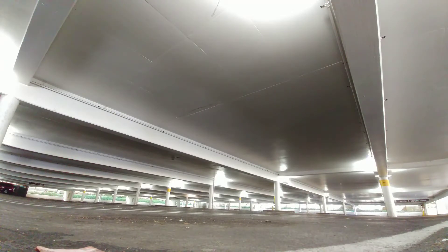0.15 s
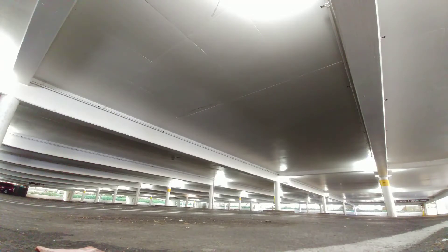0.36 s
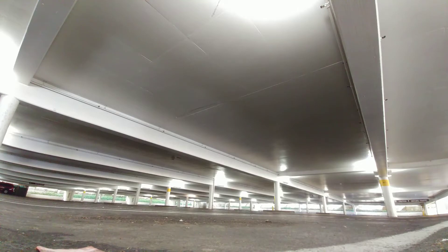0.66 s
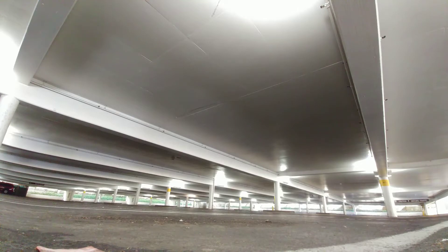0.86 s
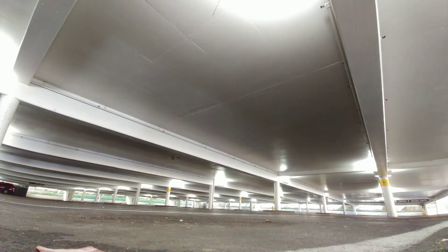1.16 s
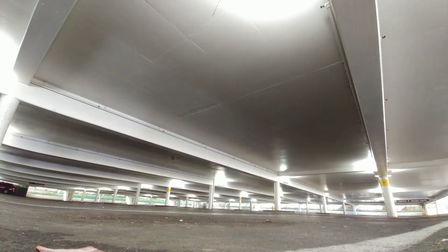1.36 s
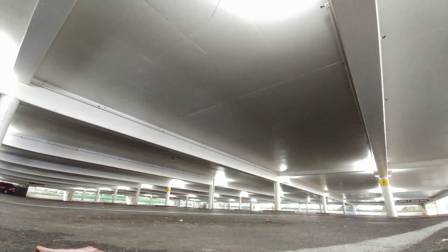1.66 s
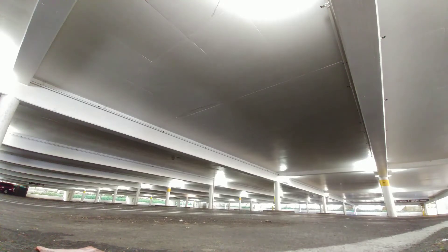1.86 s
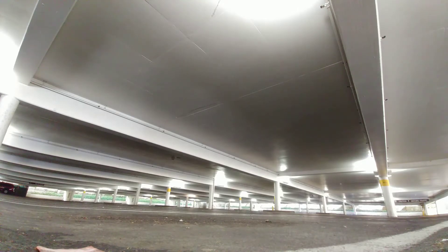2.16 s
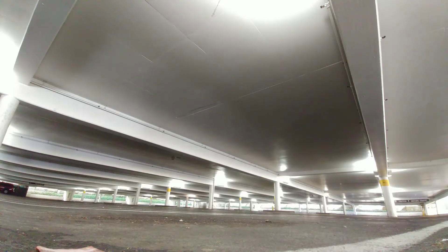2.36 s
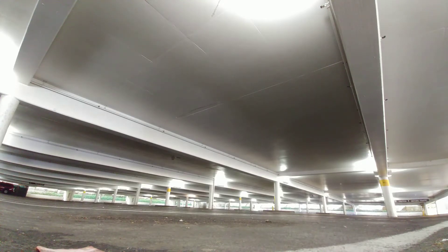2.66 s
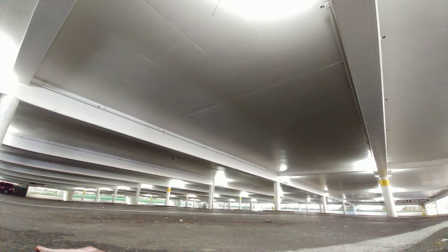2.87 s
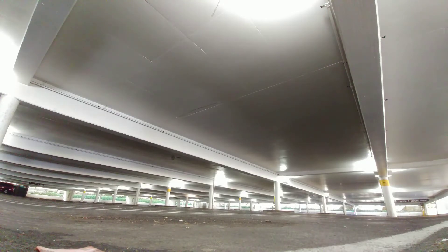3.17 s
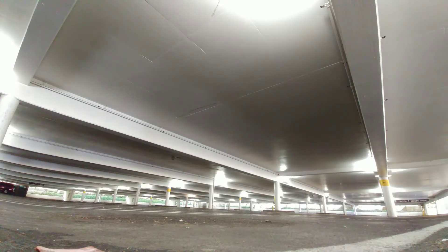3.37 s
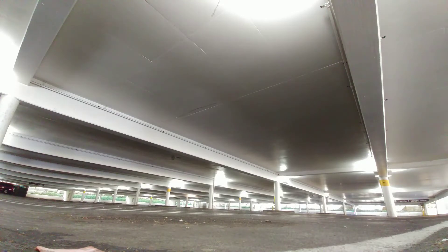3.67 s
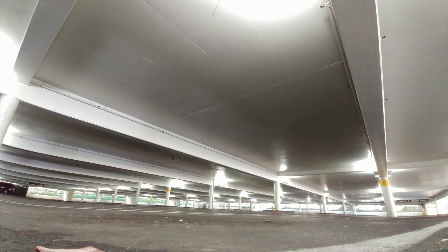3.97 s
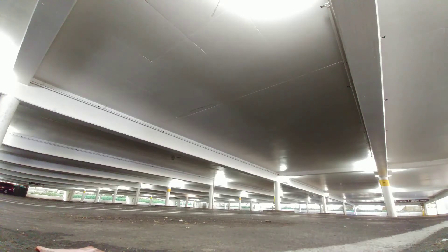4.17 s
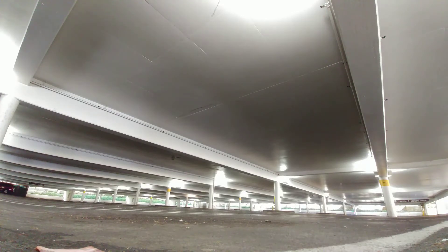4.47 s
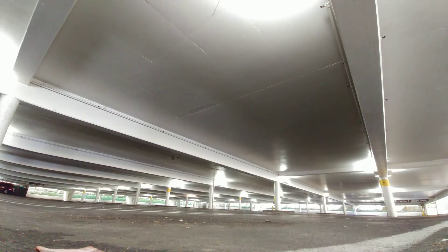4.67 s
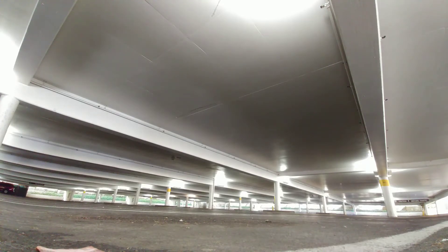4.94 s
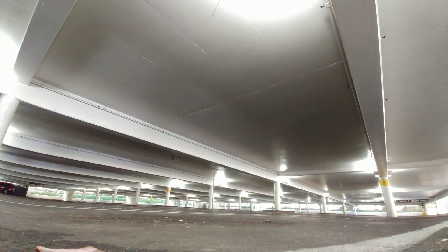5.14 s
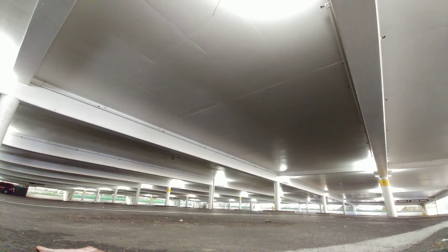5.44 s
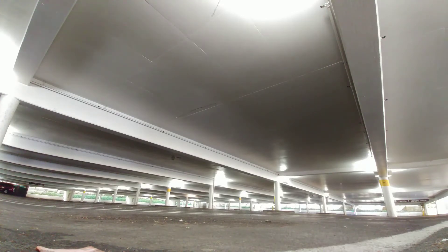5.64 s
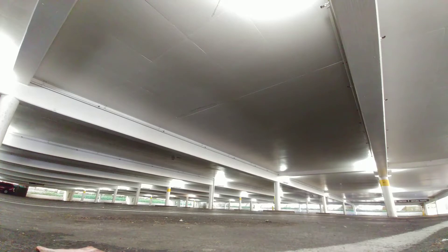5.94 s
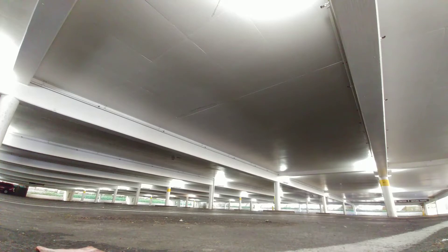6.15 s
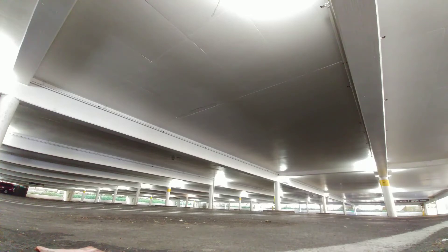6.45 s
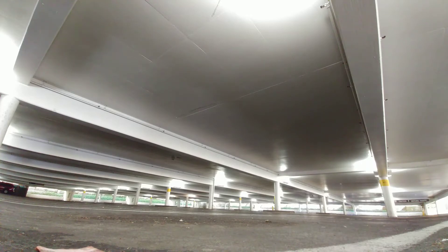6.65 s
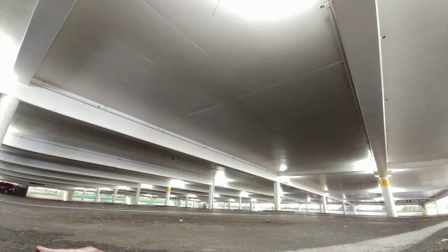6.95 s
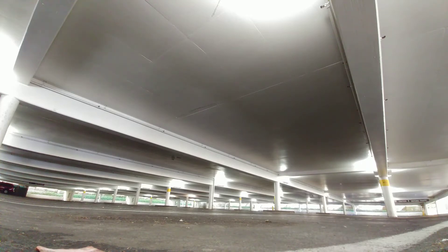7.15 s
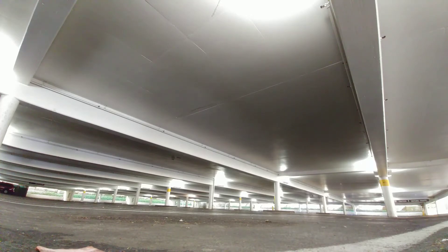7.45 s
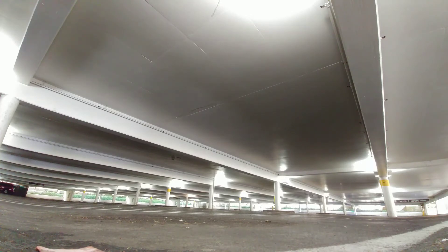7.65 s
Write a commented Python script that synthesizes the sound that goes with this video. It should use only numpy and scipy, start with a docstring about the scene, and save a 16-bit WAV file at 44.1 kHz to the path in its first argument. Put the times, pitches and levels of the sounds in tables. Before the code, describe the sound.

One single engine rev, heard in stereo in a large reverberant garage: deep exhaust boom pulsing against its own echo, swelling into hard rasp and a nasal pipe drone, then dropping steadily over several seconds. Thin high whistles flutter during the fall, clatter softens, and a quiet lumpy idle remains with a faint whine. A brief sputtering puff of air, with a soft thump, closes it.

```python
"""Sports car revving in a concrete garage

A four-cylinder engine revs once and sinks back to a droning idle; every layer but the whistles and the spit
of air follows one firing phase. The exhaust boom is a sine with harmonics, set ringing by the garage; pulse
trains and noise excite the tailpipe as rasp and drone. Clatter and gas are noise flaring at each firing;
thin whistles sound as the revs fall, and air spits sharply at the end. The boom throbs, and a limiter ducks
the whole sound at its peaks."""
import sys
import numpy as np
from scipy import signal
from scipy.fft import rfft, irfft, next_fast_len
from scipy.io import wavfile
from scipy.ndimage import uniform_filter1d, minimum_filter1d

SR = 44100
rng = np.random.default_rng(int(sys.argv[2]) if len(sys.argv) > 2 else 0)


def unload_wav(signal):
    """Save mono or channel-first audio to the path in sys.argv[1] as 16-bit WAV at rate SR, clipped to [-1, 1]."""
    wavfile.write(
        sys.argv[1],
        SR,
        np.round(np.clip(np.atleast_2d(signal).T, -1, 1) * 32767).astype(np.int16),
    )


N = 344421
TIME = np.arange(N) / SR

# engine speed before its small wander: t/s, firing rate/Hz
ENGINE_SPEED = [(0, 85), (.25, 88.4), (.5, 100.4), (.72, 110.6), (.92, 125.7), (1.2, 139), (1.5, 151.7),
                (1.88, 190), (2.3, 178.5), (2.9, 131.5), (3.5, 106.4), (3.85, 84.6), (4.2, 67.6),
                (4.45, 57), (4.75, 54), (5.0, 44), (5.85, 39.5), (6.2, 34.2), (6.75, 28.4), (7.3, 27.4),
                (7.81, 28.2)]


def engine_speed():
    """Quasi-periodicity: the firing rate follows the rev, never quite even."""
    return curve(ENGINE_SPEED) * (1 + .005 * wander(top_hz=10))


# mean strength of each cylinder's pulse, in firing order: level/dB
CYLINDER_LEVELS = [0.88, -1.2, 0.55, 0.94]
# spread of pulse strength as a fraction of its mean, off and on the throttle
UNEVEN_COASTING, UNEVEN_DRIVEN = .5, .3


def firings(turns, uneven):
    """Impulse excitation: one pulse a firing; cylinders differ, and so does each burn."""
    at = np.flatnonzero(np.diff(np.floor(turns)))
    cylinder = gain_of(np.resize(CYLINDER_LEVELS, len(at)))
    burn = 1 + uneven[at] * rng.standard_normal(len(at))
    pulses = np.zeros(N)
    pulses[at] = cylinder * burn
    return pulses


def puffs(turns, length, between):
    """Modulated turbulence: noise flares at each firing and dies away; length is in firing periods."""
    flare = np.exp(-(turns % 1) / length)
    return (between + flare) * rng.standard_normal(N)


# exhaust boom before throbs and trim: t/s, level/dB
BOOM_LEVEL = [(0, -5), (.22, -14), (.33, -14.5), (.55, -9), (1.6, -12), (1.9, -16.5), (2.35, -9),
              (2.7, -13.5), (3.6, -9), (4.7, -8), (5.6, -19.5), (6.6, -20), (6.9, -16.9), (7.81, -15)]
# silencer response: f/Hz, level/dB
SILENCER_RESPONSE = [(25, -39.5), (40, -21), (53, 16), (185, 2), (260, -13)]
# gain of the garage echo added to the direct engine note: t/s, level/dB
ECHO_LEVEL = [(0, 0), (.6, 1), (1.1, 6), (2.0, 5), (2.8, 10), (3.3, 2), (3.9, -4), (4.7, 3), (6.2, 1),
              (6.9, -9)]
# before the silencer, against the firing note: half order at the top of the revs, third harmonic at idle
HALF_ORDER_DB, IDLE_THIRD_DB = -15.5, -8.5
BOOM_TRIM_DB = 2.08
LOW_CUT_HZ = 48.3  # little of the boom is picked up below this


def boom(turns, rate):
    """Harmonic radiation and reverberation: the firing note meets its echo; overtones take over near idle."""
    idling = np.clip((51 - rate) / 17, 0, 1)
    racing = np.clip((rate - 140) / 45, 0, 1)
    force = gain_of(5.2 * racing)  # the top of the rev is loudest and hangs longest in the garage
    slowing = uniform_filter1d(1. * (np.gradient(curve(ENGINE_SPEED)) < 0), size=SR // 2)

    angle = 2 * np.pi * turns
    second = (0.1 + 4.5 * idling) * np.sin(2 * angle)
    third = gain_of(IDLE_THIRD_DB) * idling * np.sin(3 * angle)
    half = gain_of(HALF_ORDER_DB) * racing * slowing * np.sin(angle / 2)
    source = force * colour(np.sin(angle) + second + third + half, SILENCER_RESPONSE)

    near = direct(source + standing_waves(source))
    echo = gain_of(curve(ECHO_LEVEL)) * garage(source)
    note = steady(near + echo, seconds=0.54)
    level = gain_of(curve(BOOM_LEVEL) + throbs() + BOOM_TRIM_DB)
    x = level * steady(note + burble(turns, rate), seconds=0.12)
    return filtered(x, lambda hz: 1 - 1 / (1 + (hz / LOW_CUT_HZ) ** 10))


# throbs, where the note and its echo fall into step: middle t/s, length t/s, swell level/dB
THROB_TIMES = [(0.182, 0.09, 11.5), (0.486, 0.073, 11.5), (0.554, 0.033, 8), (0.609, 0.025, 9.5),
               (0.78, 0.11, 3), (0.908, 0.11, 2.5), (1.039, 0.077, 9.5), (1.798, 0.036, 4.5),
               (2.258, 0.1, 0), (2.426, 0.14, -1), (3.588, 0.025, 4.5), (3.828, 0.14, 3.5),
               (4.012, 0.086, 6), (4.284, 0.045, 6), (4.41, 0.032, 3), (4.97, 0.069, 2.5),
               (5.194, 0.089, 3), (5.507, 0.067, 5.5), (5.766, 0.11, 6), (6.495, 0.14, 3.5)]
# short gaps before and after each throb, where the two cancel: depth, distance from its edge, half-width
GAP_DB, GAP_AFTER_S, GAP_S = -6, 0.023, 0.012


def throbs():
    """Interference, as tabled level changes in dB: a rounded swell between two short gaps."""
    db = np.zeros(N)
    for middle, length, swell_db in THROB_TIMES:
        away = abs(TIME - middle)
        swell = swell_db * np.exp(-(2 * away / length) ** 4)
        gaps = GAP_DB * np.exp(-((away - length / 2 - GAP_AFTER_S) / GAP_S) ** 2)
        db += swell + gaps
    return db


# standing waves of the garage: f/Hz, width f/Hz, level/dB
ROOM_MODES = [(55.55, 1.2, 8), (76.5, 0.76, 19.5), (87.3, 1, 7), (129, 0.91, 9.5), (177.4, 1.5, 13)]


def standing_waves(x):
    """Modal resonance: each standing wave builds while the note is on it and rings on afterwards."""
    out = np.zeros(N)
    for hz, width_hz, db in ROOM_MODES:
        keep = np.exp(-np.pi * width_hz / SR)  # decay per sample
        pole = keep * np.exp(2j * np.pi * hz / SR)
        out += gain_of(db) * 2 * signal.lfilter([1 - keep], [1, -pole], x).real
    return out


# colour of the burble: f/Hz, level/dB per Hz
BURBLE_COLOUR = [(20, -39.5), (44, -32.5), (55, 1), (62, -10), (72, -0.5), (86, -2.5), (100, -7),
                 (113, -9.5), (135, -15.5), (190, -24.5), (300, -42), (2000, -150)]
# colour of the lope, the uneven beat of the settled idle: f/Hz, level/dB per Hz
LOPE_COLOUR = [(52, -28), (80, 0), (110, -3), (150, -11), (260, -28), (2000, -150)]
# burble against the note, most as the engine coasts and elsewhere; firing rate where it is most, spread
BURBLE_TOP_DB, BURBLE_REST_DB, BURBLE_RATE_HZ, BURBLE_OCTAVES = 3.5, -19, 42, 0.72
LOPE_DB = -6.5  # against the note
# firing rate at which the idle has settled, and how far above it the burble starts to give way
SETTLED_HZ, SETTLING_HZ = 29.2, 2.2


def burble(turns, rate):
    """Random amplitude modulation: uneven burns burble on the way down to idle, then lope more lightly."""
    burns = garage(firings(turns, np.full(N, UNEVEN_COASTING)))
    coasting = np.exp(-(np.log2(rate / BURBLE_RATE_HZ) / BURBLE_OCTAVES) ** 2)
    unsettled = np.clip((rate - SETTLED_HZ) / SETTLING_HZ, 0, 1)
    burble_db = BURBLE_REST_DB + (BURBLE_TOP_DB - BURBLE_REST_DB) * coasting
    burbling = gain_of(burble_db) * steady(colour(burns, BURBLE_COLOUR), seconds=0.085)
    loping = gain_of(LOPE_DB) * steady(colour(burns, LOPE_COLOUR), seconds=0.14)
    return unsettled * burbling + (1 - unsettled) * loping


# pipe rasp before trim and wander: t/s, level/dB
RASP_LEVEL = [(0, -21), (0.22, -26.5), (0.38, -18), (.8, -19.5), (1.5, -14.5), (1.95, -15), (2.7, -16.5),
              (3.7, -21), (4.0, -27.5), (5.4, -32), (6.8, -29.5), (7.55, -30)]
# tailpipe response: f/Hz, level/dB
PIPE_RESPONSE = [(90, -23), (150, -3), (240, -5), (285, -4), (314, 0.5), (362, -8), (440, -5.5),
                 (650, -8.5), (800, -12), (1020, -10), (1300, -29), (2200, -35.5), (5000, -73.5)]
RASP_TRIM_DB, RASP_WANDER_DB = 2, 1
PIPE_DIRECT_DB = -8  # gain of the direct pipe sound added to its garage echo
SOFT_HZ = 625  # slow pulse fronts carry little above this


def rasp(turns, rate):
    """Source and filter: sharp pulse fronts and gas ring the pipe; off the throttle mostly gas is left."""
    pedal = throttle()
    uneven = UNEVEN_COASTING + (UNEVEN_DRIVEN - UNEVEN_COASTING) * pedal  # burns are steadier under load
    fronts = (0.15 + 0.79 * pedal) * firings(turns, uneven)
    gas = 0.056 * puffs(turns, length=0.43, between=0.42)
    drive = fronts + gas
    heard = colour(gain_of(PIPE_DIRECT_DB) * direct(drive) + garage(drive), PIPE_RESPONSE)

    soft = filtered(heard, lambda hz: 1 / (1 + (hz / SOFT_HZ) ** 8))
    steep = np.clip((rate - 55) / 105, .3, 1)  # the fronts steepen with the revs
    level = gain_of(curve(RASP_LEVEL) + RASP_TRIM_DB + RASP_WANDER_DB * wander(top_hz=7.6))
    return level * steady(soft + steep * (heard - soft), seconds=0.14)


# the one press of the pedal: down from, down by, lifted from, lifted by; resting opening (0-1)
PRESS_S, FULL_S, LIFT_S, SHUT_S, IDLE_THROTTLE = 0.18, 0.49, 2.7, 3.1, 0.23


def throttle():
    """Load control: the pedal goes down, is held and is lifted."""
    opening = [IDLE_THROTTLE, 1, 1, IDLE_THROTTLE]
    return np.interp(TIME, [PRESS_S, FULL_S, LIFT_S, SHUT_S], opening)


# pipe drone before flutter: t/s, level/dB
DRONE_LEVEL = [(0, -34.5), (.3, -27), (.72, -17.5), (1.6, -14), (1.9, -18), (2.4, -13.5), (3.05, -20),
               (3.7, -34), (4.2, -51.5), (7.81, -80)]
DRONE_HZ, DRONE_WIDTH_HZ = 536, 49  # upper resonance of the pipe, and half-width of each of its four stages
DRONE_JITTER_TURNS, DRONE_FLUTTER_DB = .025, 2.0  # jitter in firing periods


def drone(turns):
    """Resonance: the pipe sings on harmonics near its mode; uneven firing and the garage make it flutter."""
    jittered = turns + DRONE_JITTER_TURNS * wander(top_hz=41)
    pulses = firings(jittered, np.full(N, UNEVEN_DRIVEN))
    x = resonance(pulses, DRONE_HZ, DRONE_WIDTH_HZ)
    sung = steady(gain_of(PIPE_DIRECT_DB) * direct(x) + garage(x), seconds=.09)
    return gain_of(curve(DRONE_LEVEL) + DRONE_FLUTTER_DB * wander(top_hz=30)) * sung


def resonance(x, centre_hz, width_hz):
    """Cascaded resonance: four equal stages give the tailpipe mode steep sides."""
    return filtered(x, lambda hz: 1 / (1 + 1j * (hz - centre_hz) / width_hz) ** 4)


# engine clatter before trims, surges and wander: t/s, level/dB
CLATTER_LEVEL = [(0, -46.5), (0.25, -45), (1.0, -34.5), (1.5, -30), (1.95, -26.5), (2.3, -27), (2.75, -26),
                 (3.3, -27), (3.65, -31), (3.9, -41), (4.75, -38), (5.8, -40), (6.4, -36), (7.55, -35)]
# colour of the clatter when revved: f/Hz, level/dB per Hz
REVVED_COLOUR = [(410, -29.5), (700, -2.5), (792, -2.5), (949, -3), (1090, 0.5), (1320, -5.5), (1580, -5),
                 (2070, -8.5), (2700, -12), (3660, -17.5), (4530, -31), (5000, -35.5), (6500, -50),
                 (11000, -120)]
# colour of the clatter at idle: f/Hz, level/dB per Hz
IDLE_COLOUR = [(330, -60), (560, -2.5), (648, 0.5), (758, -8), (861, -4), (1240, -9), (1550, -8),
               (2210, -15), (2830, -19), (3020, -22.5), (3470, -20), (4050, -28), (5000, -43), (6500, -79),
               (11000, -120)]
CLATTER_TRIM_DB = 1


def clatter(turns, rate):
    """Modulated noise: valves and combustion rattle over steady noise, the echo that fills the gaps."""
    revved = np.clip((rate - 58) / 32, 0, 1)
    x = microphones(puffs(turns, length=0.38, between=4.5), puffs(turns, length=1.0, between=4.3))
    fast = gain_of(2.0) * steady(colour(x, REVVED_COLOUR), seconds=0.32)
    slow = gain_of(3.5) * steady(colour(x, IDLE_COLOUR), seconds=.4)
    mix = np.sqrt(revved) * fast + np.sqrt(1 - revved) * slow
    level = gain_of(curve(CLATTER_LEVEL) + CLATTER_TRIM_DB + surges() + 0.56 * wander(top_hz=27))
    return level * mix * gain_of([[.5], [-.5]])


# surges of the roar: middle t/s, length t/s, swell level/dB
SURGE_TIMES = [(0.41, 0.098, 1.5), (0.885, 0.064, 1.5), (1.544, 0.12, 4.5), (1.847, 0.049, -1),
               (2.1, 0.037, 3.5), (2.579, 0.081, 4), (2.83, 0.086, 1.5), (3.73, 0.16, 2.5),
               (4.369, 0.15, 2.5)]


def surges():
    """Amplitude modulation: brief changes of the engine's roar, mostly swells, in dB."""
    return sum(db * np.exp(-(2 * (TIME - middle) / length) ** 2) for middle, length, db in SURGE_TIMES)


# rush of gas before surges: t/s, level/dB
GAS_LEVEL = [(0, -63), (0.25, -63.5), (1.0, -48.5), (1.95, -36), (2.25, -39.5), (2.6, -36), (3.45, -41.5),
             (3.95, -51.5), (4.9, -52), (5.6, -56), (7.1, -58), (7.55, -62)]
# colour of the rush of gas: f/Hz, level/dB per Hz
RUSH_COLOUR = [(2800, -35.5), (4300, 0.5), (5200, -1.5), (5900, 0.5), (6800, -7), (7700, 4), (8600, -5),
               (9500, -15), (10200, -43.5), (12000, -21.5), (13500, -44.5), (15500, -33)]


def rush(turns):
    """Turbulence noise: gas and belts hiss, mostly on the left."""
    left, right = puffs(turns, length=0.99, between=0.93), puffs(turns, length=0.26, between=1.0)
    x = colour(microphones(left, right), RUSH_COLOUR) * gain_of([[2.5], [-2.5]])
    return gain_of(curve(GAS_LEVEL) + 0.8 * surges()) * steady(x, seconds=0.21)


# whistles before flutter and panning: start t/s, peak t/s, end t/s, f/Hz, width f/Hz, peak level/dB
WHISTLE_BANDS = [ (3.6, 3.87, 3.99, 13100, 450, -47), (3.98, 4.1, 4.3, 13050, 400, -58),
                 (4.2, 4.55, 5.5, 14150, 300, -69), (3.0, 5.15, 6.5, 5800, 380, -58),
                 (3.0, 5.0, 12, 1310, 24, -55), (2.0, 5.5, 12, 2736, 20, -58), ]


def whistles():
    """Narrow-band noise: fluttering whistles swell and fade; the two lowest stay on as a faint whine."""
    out = np.zeros((2, N))
    for start, peak, end, pitch, width, db in WHISTLE_BANDS:
        noise = rng.standard_normal((2, N))
        x = filtered(noise, lambda hz: 1 / (1 + (2 * (hz - pitch) / width) ** 4))
        swell = np.interp(TIME, [start, peak, end], [0, 1, 0]) ** 1.5
        out += gain_of(db + 2.8 * wander(top_hz=14)) * swell * x / x.std()
    return out * gain_of([[2], [-3]])


# colour of the spit of air: f/Hz, level/dB per Hz
SPIT_COLOUR = [(96, -12), (144, 17), (335, -5.5), (1010, -1.5), (1390, -5), (2120, -2.5), (3280, -10),
               (4160, -4.5), (4920, -9.5), (5920, -11.5), (6820, -16.5), (7980, -10), (9320, -25),
               (13100, -21), (15400, -41)]
# narrow bands that ring in the spit of air: f/Hz, width f/Hz, level/dB
SPIT_BANDS = [(3980, 210, -0.5), (5840, 340, -2.5), (7590, 120, 3.5)]
SPIT_S, SPIT_DB, SPUTTER_DB = 7.606, -20.4, 2.4  # start, level of the jet before its envelope, sputter
SPIT_ATTACK_S, SPIT_HOLD_S, SPIT_FALL_DB_PER_S = 0.045, 0.021, 245
SPIT_ECHO_DB, SPIT_ECHO_DB_PER_S = -12.5, 62  # gain of the echo noise, and its fall from the start


def hiss():
    """Jet noise: a sputtering spit with a soft low thump and ringing bands; a brief, smooth echo follows."""
    air, echo = (colour(microphones(*rng.standard_normal((2, N))), SPIT_COLOUR) for _ in range(2))
    jet = air.copy()
    for f, width, db in SPIT_BANDS:
        jet += filtered(air, lambda hz: gain_of(db) / (1 + 2j * (hz - f) / width))

    age = TIME - SPIT_S
    attack = np.clip(age / SPIT_ATTACK_S, 0, 1) ** 1.1
    fall_db = SPIT_FALL_DB_PER_S * np.maximum(age - SPIT_ATTACK_S - SPIT_HOLD_S, 0)
    echo_db = SPIT_ECHO_DB - SPIT_ECHO_DB_PER_S * np.maximum(age, 0)
    x = jet * gain_of(SPUTTER_DB * wander(top_hz=150) - fall_db) + echo * gain_of(echo_db)
    return gain_of(SPIT_DB) * attack * x / jet.mean(0).std() * gain_of([[1], [-1]])


# reverberation time of the garage: f/Hz, t60 t/s
REVERBERATION = [(60, 6.2), (170, 4), (500, 3.4), (2000, 1.4), (8000, 0.11)]


def garage(x, build_s=0.042):
    """Diffuse reverberation: dense echoes between concrete floor and ceiling; the bass lingers for seconds."""
    hz, t, z = signal.stft(rng.standard_normal((2, 3 * SR)), SR, nperseg=512)
    t60 = read(REVERBERATION, hz)[:, None]
    decay = np.exp(-np.log(1000) * t / t60)
    build = 1 - np.exp(-t / build_s)
    even = np.sqrt(2 * np.log(1000) / t60 / SR)  # offsets the greater energy of longer decays
    tail = microphones(*signal.istft(z * decay * build * even, SR, nperseg=512)[1])
    running = np.concatenate([x[:SR // 2][::-1], x])  # the engine is already running
    return signal.fftconvolve(running[None], tail, axes=1)[:, SR // 2:][:, :N]


# likeness of the two microphones: f/Hz, coherence (0-1)
MIC_LIKENESS = [(60, 0.97), (130, 0.96), (290, 0.76), (600, 0.8), (950, 0.4), (1350, 0.8), (2100, 0.7),
                (3000, 0.35), (5000, 0.4), (8000, 0.1)]
MIC_LAG_S = 0.483e-3  # right after left, for direct sound
DIFFUSE_HZ = 280  # around and below this, sound from all sides shrinks the lag


def microphones(a, b):
    """Spatial coherence: of two spaced microphones the right hears later, and is less alike in the treble."""
    same = lambda hz: np.clip(read(MIC_LIKENESS, hz), 0, 1)
    lag = lambda hz: MIC_LAG_S * hz / (hz + DIFFUSE_HZ)
    right = filtered(a, same) + filtered(b, lambda hz: np.sqrt(1 - same(hz) ** 2))
    return np.array([a, filtered(right, lambda hz: np.exp(-2j * np.pi * hz * lag(hz)))])


def direct(x):
    """Time difference of arrival: sound straight from the car reaches the left microphone first."""
    return np.array([x, np.interp(TIME - MIC_LAG_S, TIME, x)])


def gain_of(db):
    """Level definition: decibels to an amplitude factor."""
    return 10 ** (np.asarray(db) / 20)


def curve(rows):
    """Linear interpolation: a timed table, sample by sample."""
    return np.interp(TIME, *np.transpose(rows))


def read(points, hz):
    """Logarithmic interpolation: a table read over log frequency."""
    f, value = np.transpose(points)
    return np.interp(np.log(hz + 1), np.log(f + 1), value)


def filtered(x, response):
    """Linear filtering: multiplies the spectrum by a response given as a function of Hz."""
    size = next_fast_len(x.shape[-1] + SR // 2)
    spectrum = rfft(x, size) * response(np.fft.rfftfreq(size, 1 / SR))
    return irfft(spectrum, size)[..., :x.shape[-1]]


def colour(x, spectrum):
    """Spectral shaping: filters a sound by a table of f/Hz, level/dB."""
    return filtered(x, lambda hz: gain_of(read(spectrum, hz)))


def steady(x, seconds):
    """Level normalisation: brings the running level of a stereo sound to one."""
    size = max(int(seconds * SR), 2)
    power = uniform_filter1d(uniform_filter1d(x.mean(0) ** 2, size), size)
    return x / np.sqrt(abs(power) + 1e-14)


def wander(top_hz):
    """Low-pass random process: slow chance of unit size."""
    x = filtered(rng.standard_normal(N), lambda hz: np.exp(-(hz / top_hz) ** 2))
    return x / x.std()


# stereo balance given to the whole mix: t/s, left minus right level/dB
BALANCE = [(0, 2.5), (2.2, -1), (3.1, 3), (4.2, 0), (5.1, 4), (7.81, 5.5)]


def scene():
    """Superposition: the layers add, most of them driven by one firing phase, and lean left or right."""
    rate = engine_speed()
    turns = np.cumsum(rate) / SR  # firing phase, in firings
    exhaust = boom(turns, rate) + rasp(turns, rate) + drone(turns)
    engine = clatter(turns, rate) + rush(turns)
    car = exhaust + engine + whistles() + hiss()
    lean = gain_of(np.outer([.5, -.5], curve(BALANCE)))
    return car * lean / lean.mean(0)


RECOVER_DB_PER_S = 81  # how fast the limiter lets go
EDGE_HZ = 15500  # upper band limit


def record(dry):
    """Peak limiting: the gain drops fast for each peak and recovers gradually; then the band limit."""
    ceiling = .98
    over_db = 20 * np.log10(np.maximum(abs(dry).max(0) / ceiling, 1))
    recovery = RECOVER_DB_PER_S * TIME
    allowed = gain_of(recovery - np.maximum.accumulate(over_db + recovery))
    held = uniform_filter1d(minimum_filter1d(allowed, size=400), size=300)  # eases down just ahead of a peak
    fade_in = np.minimum(TIME / .008, 1)
    low_pass = signal.firwin(511, EDGE_HZ, window=("kaiser", 9), fs=SR)
    return signal.oaconvolve(dry * held * fade_in, low_pass[None], "same")


dry = scene()
out = record(dry)
unload_wav(out)
```